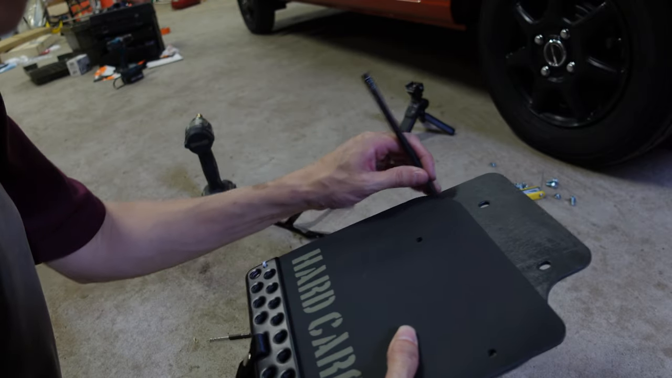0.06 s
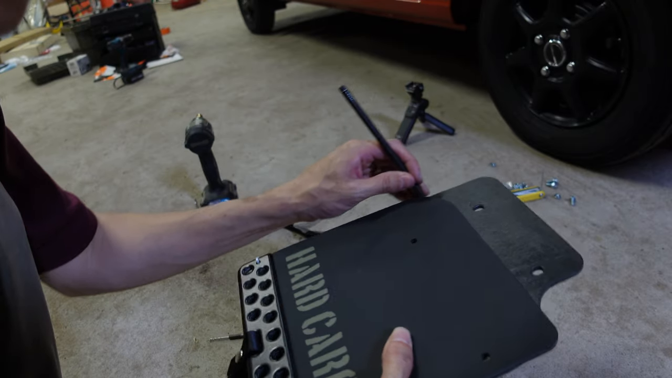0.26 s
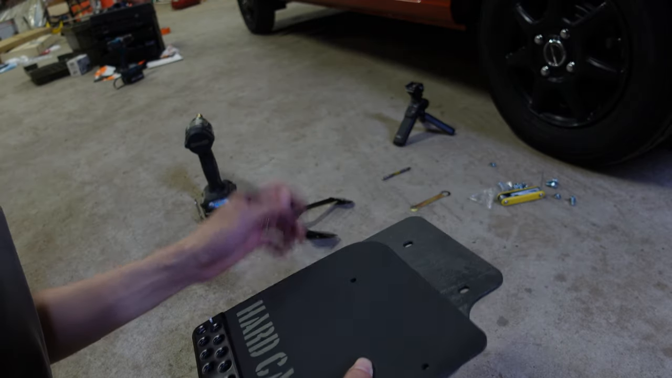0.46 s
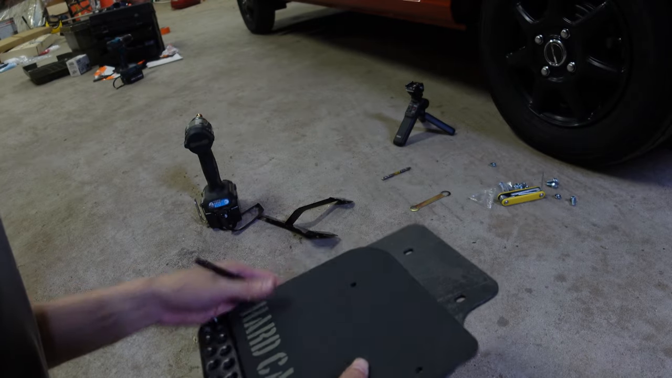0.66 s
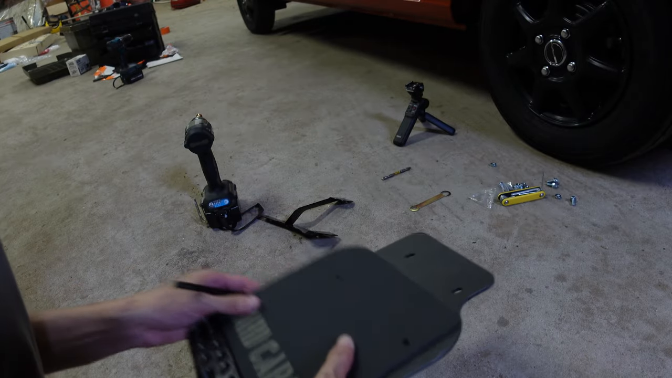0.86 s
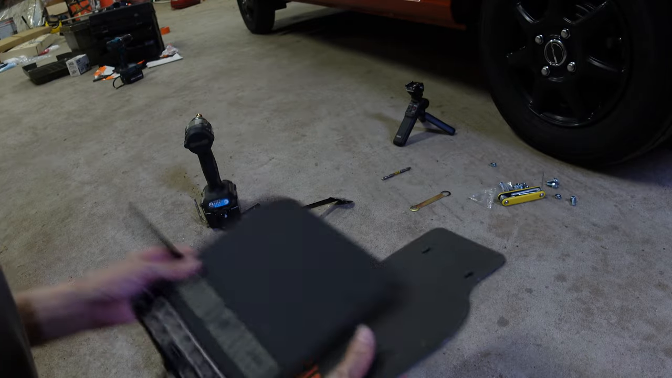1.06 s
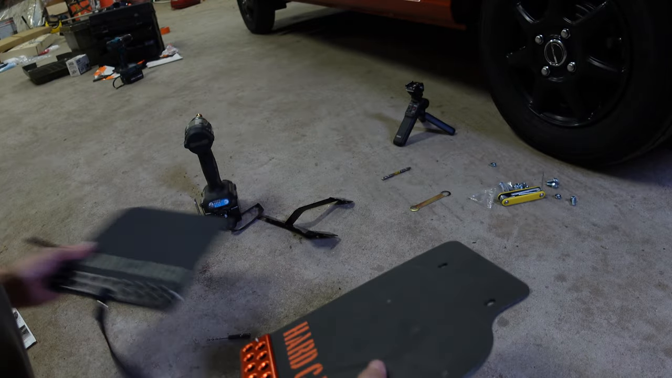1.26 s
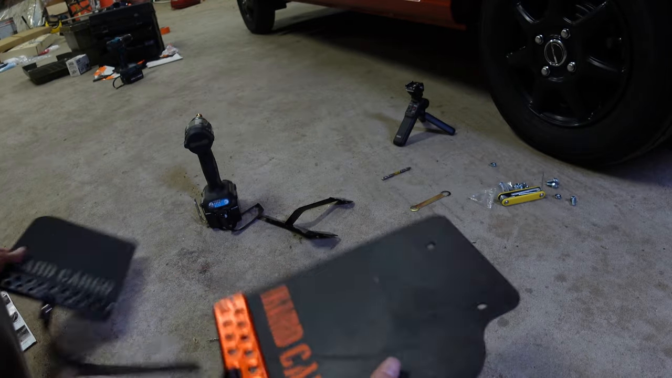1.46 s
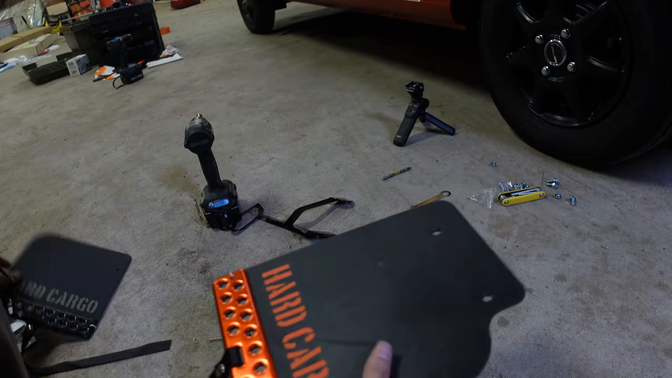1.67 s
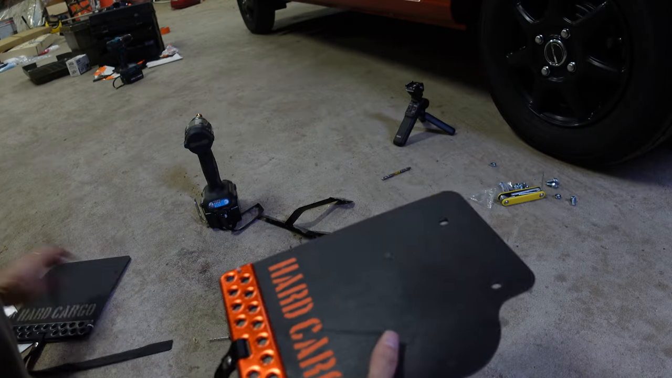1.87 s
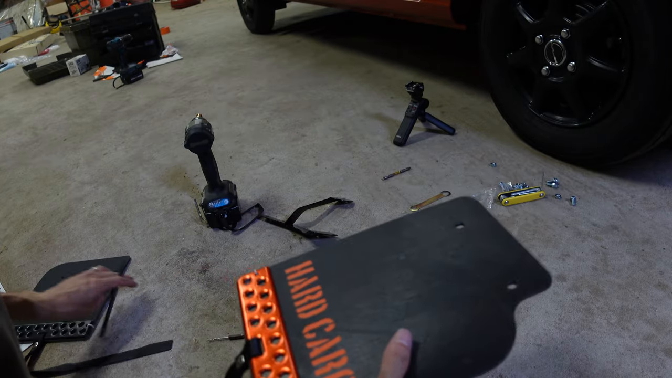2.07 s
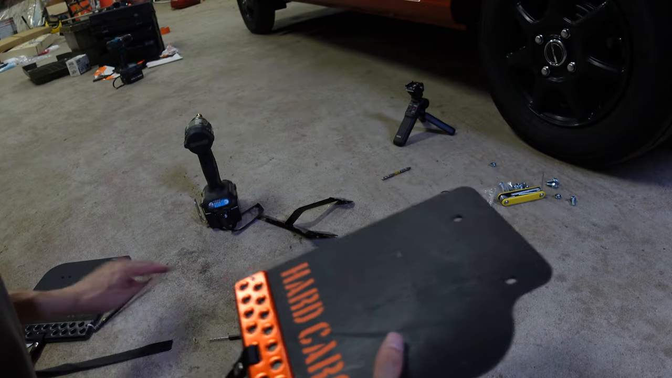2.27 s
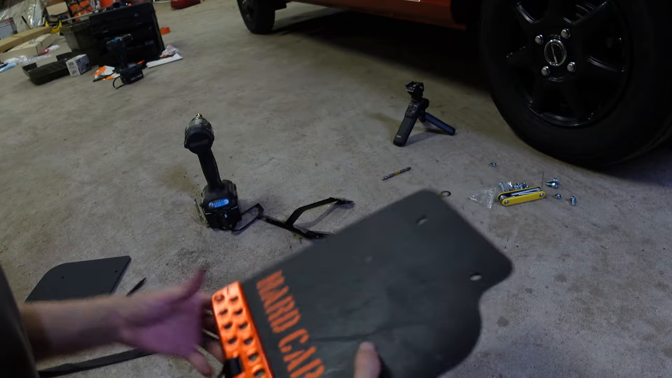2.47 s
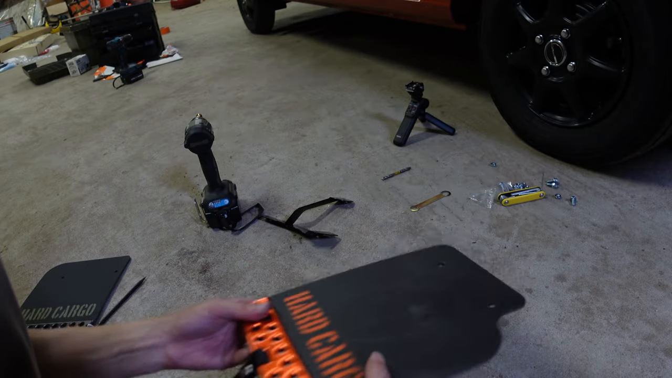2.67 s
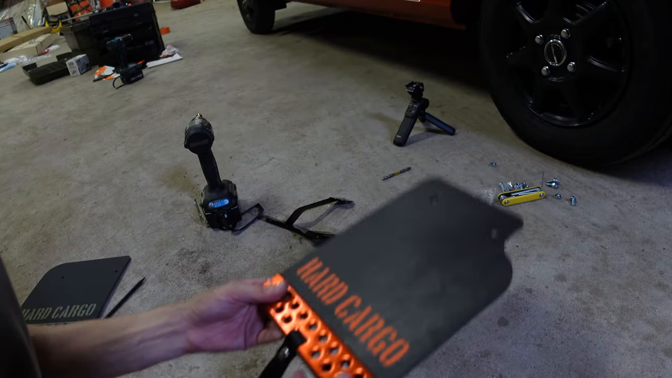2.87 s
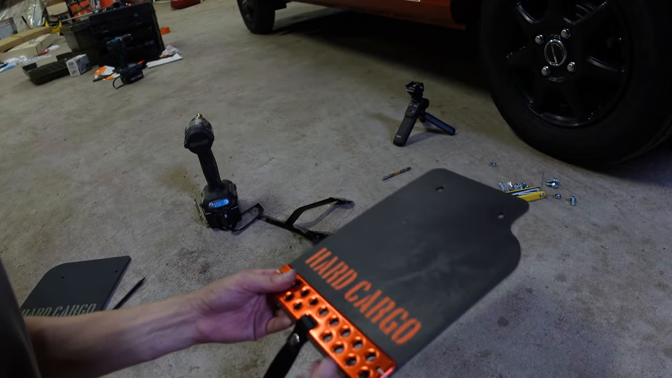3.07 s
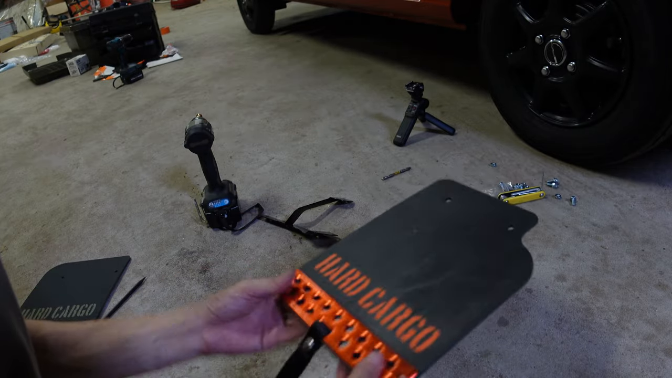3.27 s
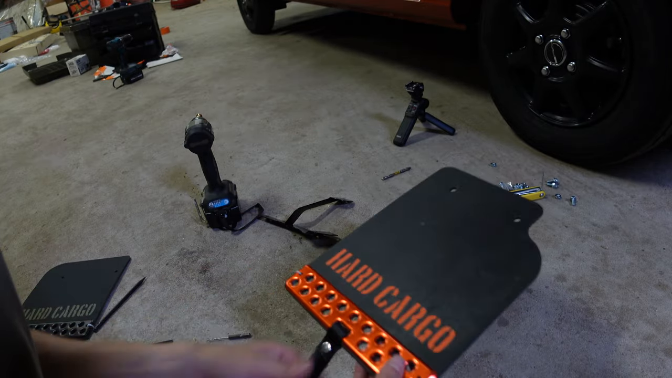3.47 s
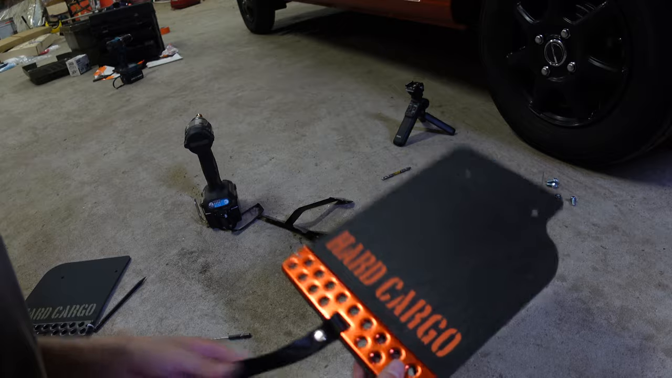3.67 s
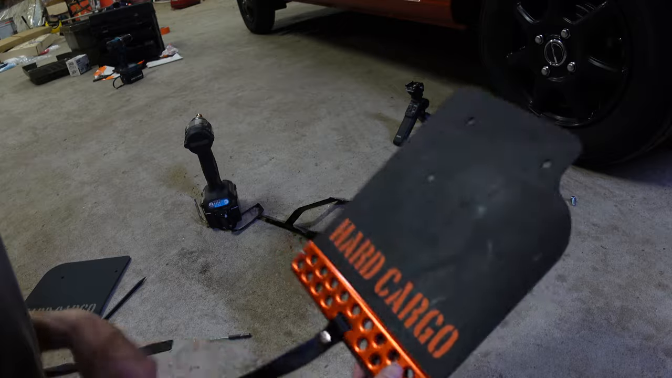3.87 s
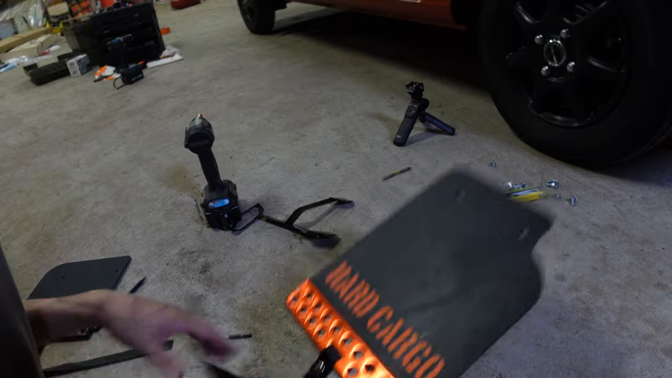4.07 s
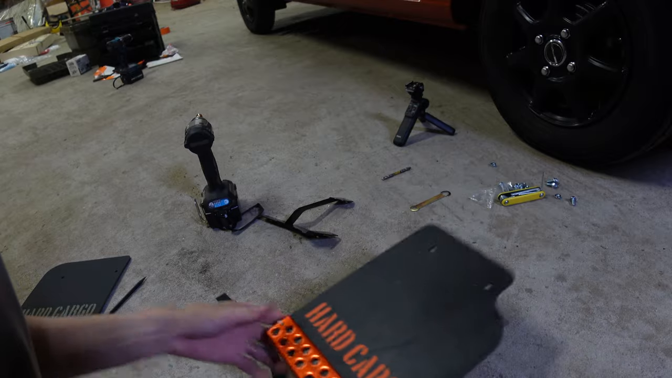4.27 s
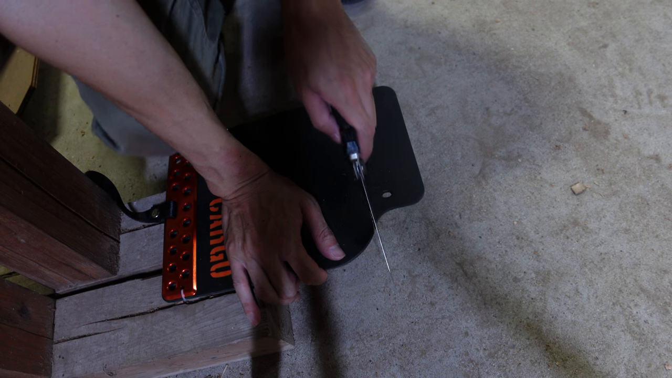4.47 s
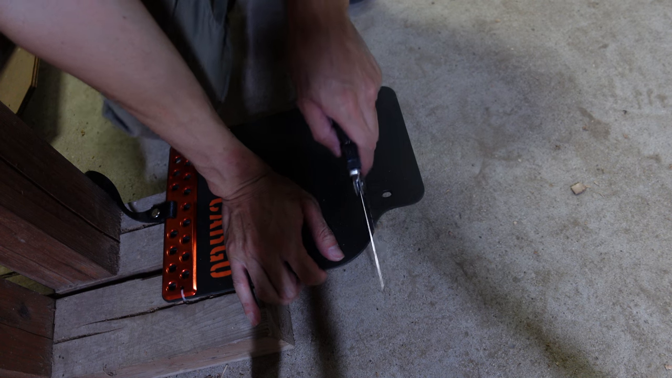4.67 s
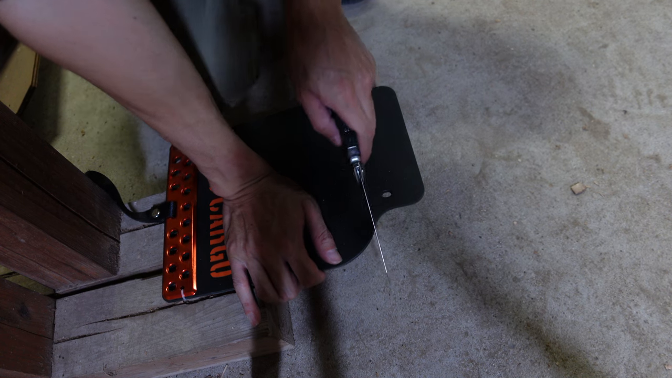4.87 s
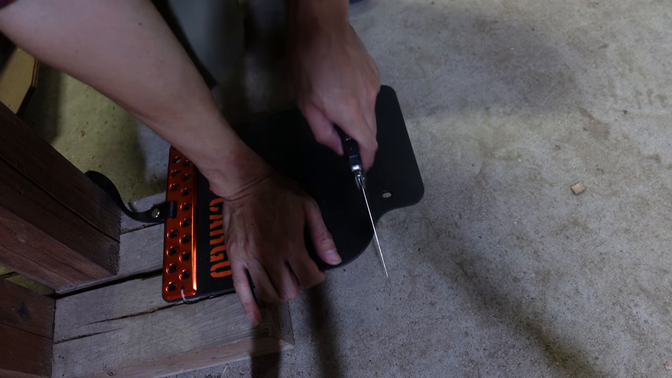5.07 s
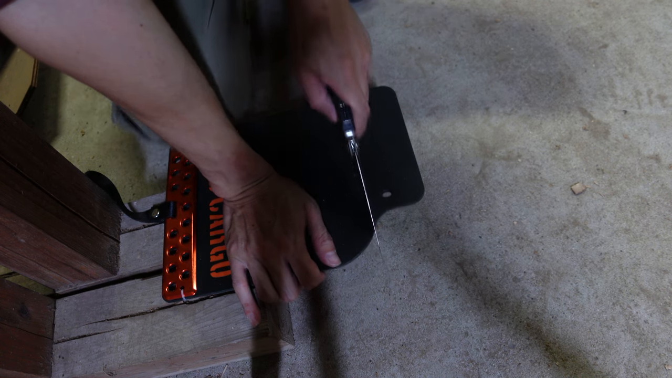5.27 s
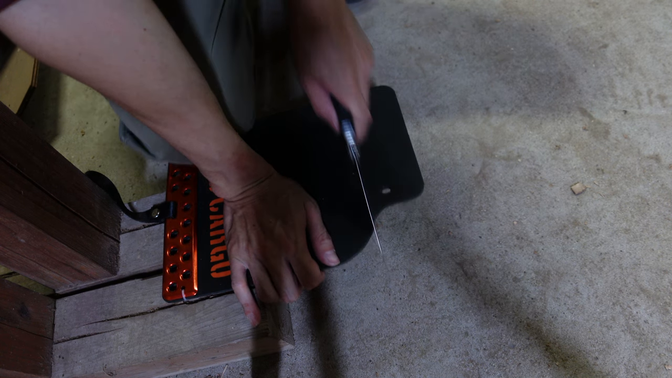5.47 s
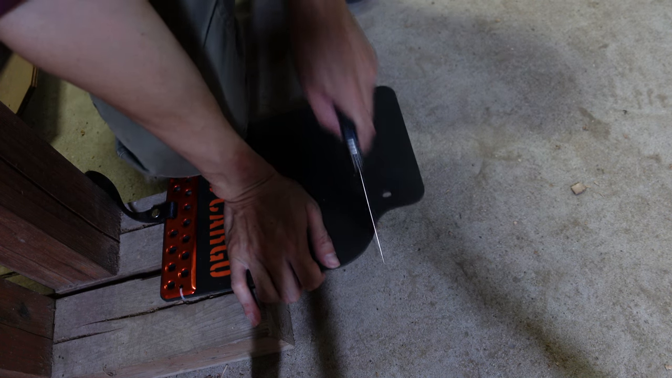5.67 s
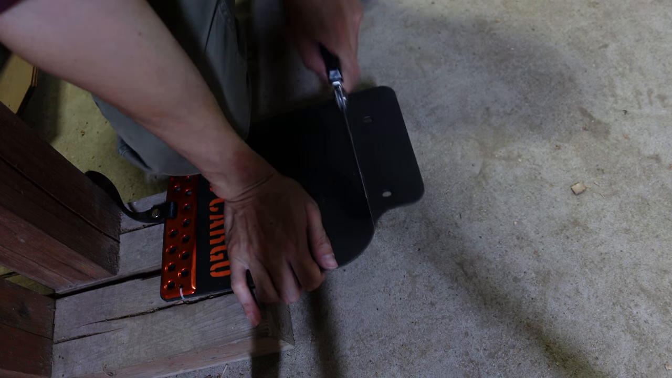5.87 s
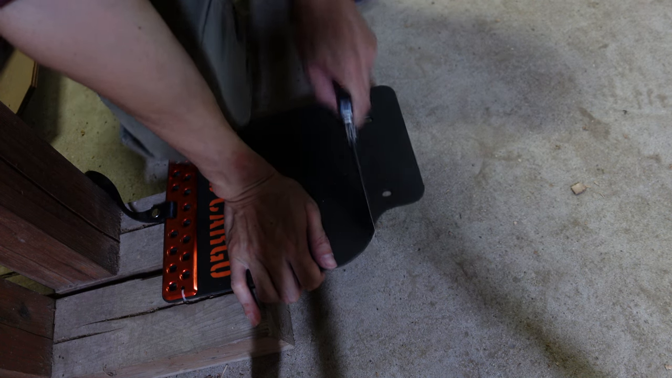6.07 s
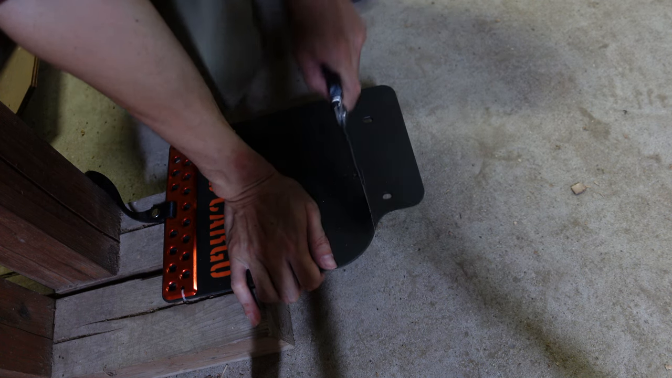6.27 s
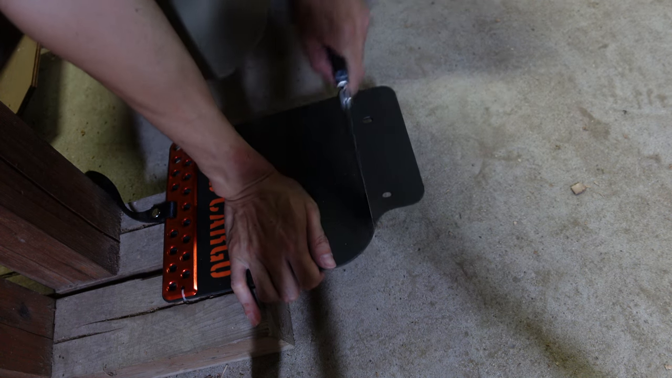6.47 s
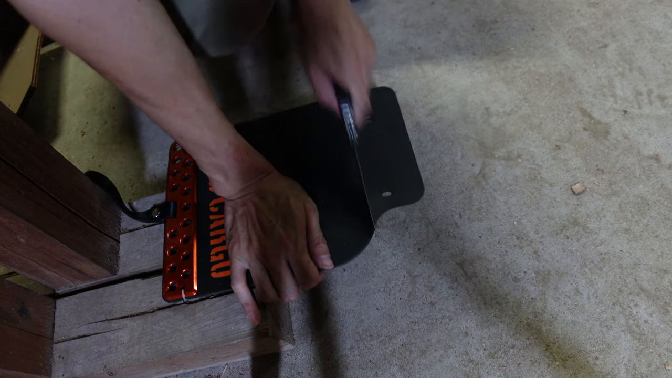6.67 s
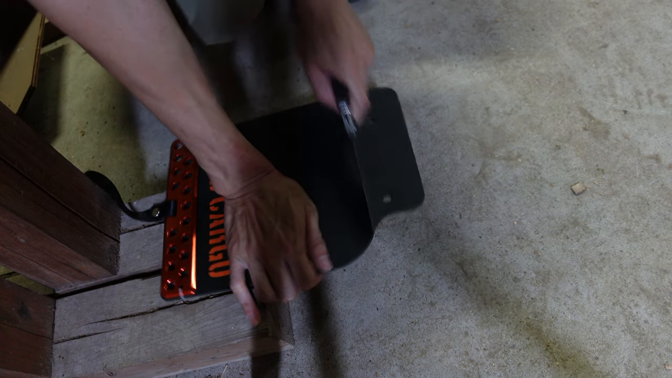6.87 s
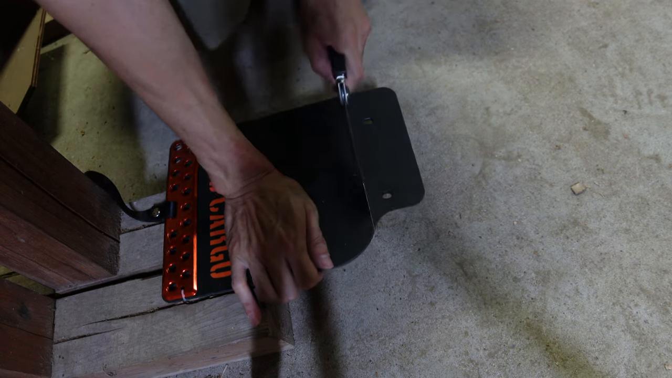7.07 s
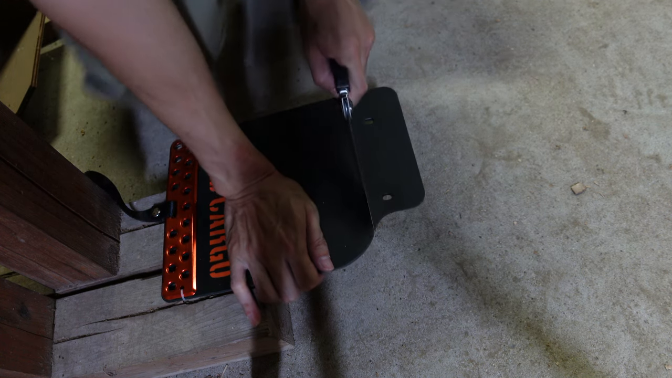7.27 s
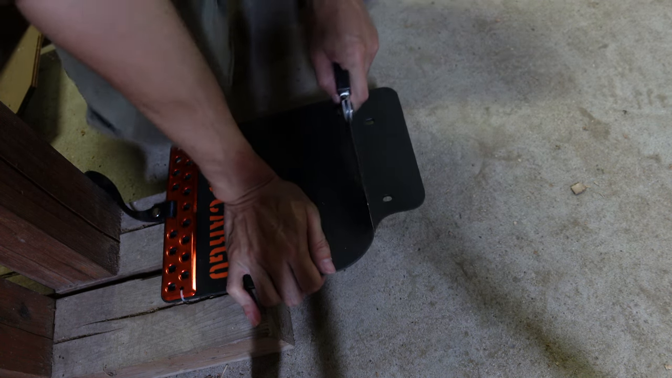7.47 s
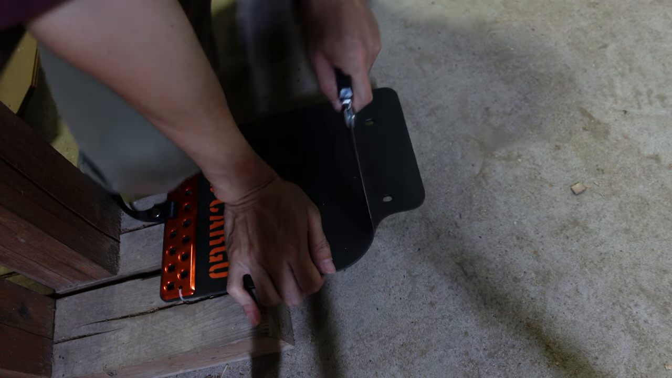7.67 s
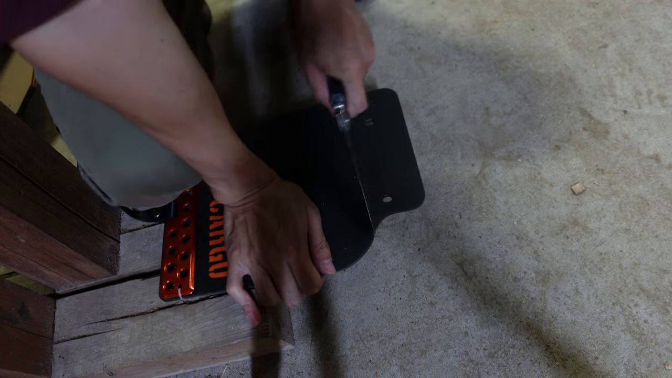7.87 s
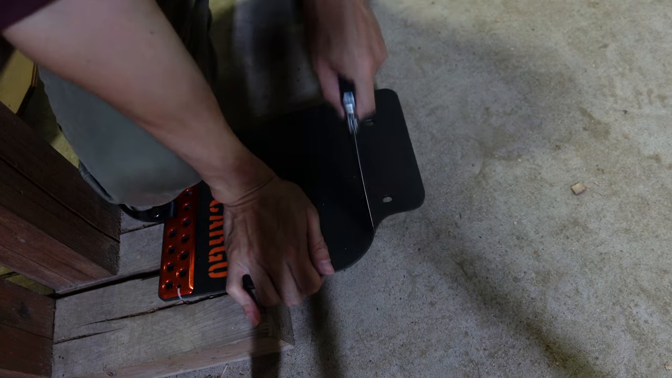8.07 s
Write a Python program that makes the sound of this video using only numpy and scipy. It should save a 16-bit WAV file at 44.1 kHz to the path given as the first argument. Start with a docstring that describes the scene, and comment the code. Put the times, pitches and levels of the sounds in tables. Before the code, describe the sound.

A dull rubber slide and bump open at 0 s over faint night air and insects. At 0.4 s an abrupt cut makes a steady, high, pulsing insect trill much louder, with a lower surging trill and regular chirps, about four a second. Close by, a mat knocks softly near 1.1 and 1.6 s, then drags with a firmer knock around 1.9 s; light rustles and ticks follow to 2.6 s, with a faint tick at 3.9. Another cut at 4.4 s brings the insects back with a wavering whistling cricket. From 4.5 to 4.8 s saw teeth slip in soft stuttering jerks; a bright scrape comes at 5.1. Rapid uneven strokes from 5.3 to 7.1 s, pausing near 6.4, drum the rubber with a dry rasp. Sharp ticks at 7.2-7.3 and the loudest clack at 7.4 end in soft rubbing and insects until 8.1. Short garage echo.

```python
"""A rubber mat slides with a dull knock while insects trill outside an open garage at night.
Handling, rustles and hard ticks follow; a small hand saw slips over the mat's edge, then works through it
on a wooden step. Friction is patchy noise, knocks and strokes ring the mat's modes, wings are pulsed noise
through resonances. A slow chirper and a whistling cricket join in. Two hard cuts join three shots."""
import sys
import numpy as np
from scipy import signal
from scipy.fft import rfft, irfft, next_fast_len
from scipy.io import wavfile
from scipy.ndimage import uniform_filter1d, map_coordinates

SR = 44100
rng = np.random.default_rng(int(sys.argv[2]) if len(sys.argv) > 2 else 0)


def dump(signal):
    """Clip the signal to [-1, 1] and save it as 16-bit WAV at the path in sys.argv[1]."""
    limited = np.clip(np.atleast_2d(signal).T, -1, 1)
    pcm = np.round(limited * 32767).astype(np.int16)
    wavfile.write(sys.argv[1], SR, pcm)


N = 358091
TIME = np.arange(N) / SR


def amp(db):
    """Decibels to an amplitude factor."""
    return 10 ** (np.asarray(db) / 20)


def unit(x):
    """x scaled to rms 1."""
    return x / np.sqrt(np.mean(x ** 2) + 1e-20)


def along(points, hz):
    """Read (frequency [Hz], value) points on a log frequency axis."""
    f, v = np.transpose(points)
    return np.interp(np.log(hz + 1), np.log(f + 1), v)


def gains(tables, fade=0.015):
    """One gain per sample for each dB column, fading to silence outside each table over fade [s]."""
    out = np.zeros((len(tables[0][0]) - 1, N))
    for rows in tables:
        s, *columns = np.transpose(rows)
        at = slice(max(0, round((s[0] - fade) * SR)), round((s[-1] + fade) * SR))
        t = TIME[at]
        gate = np.clip(np.minimum(t - s[0], s[-1] - t) / fade + 1, 0, 1)
        levels = amp([np.interp(t, s, column) for column in columns])
        out[:, at] = np.maximum(out[:, at], gate * levels)
    return out


def swells(rows, fade=0.015):
    """Gains for (crest, rise, fall, dB ..) rows: straight in dB up to the crest, then down and into silence."""
    edge_db = 20  # change over one rise or fall time; the fall runs on for two
    return gains([[(crest - rise, *np.subtract(dbs, edge_db)),
                   (crest, *dbs),
                   (crest + 2 * fall, *np.subtract(dbs, 2 * edge_db))]
                  for crest, rise, fall, *dbs in rows], fade)


def wobble(rate):
    """A smooth random curve, rate knots a second."""
    return map_coordinates(rng.standard_normal(int(N * rate / SR) + 4), [TIME * rate])


def filtered(x, response):
    """x shaped by a complex response of frequency."""
    m = next_fast_len(N + 8192)
    return irfft(rfft(x, m) * response(np.fft.rfftfreq(m, 1 / SR)), m)[..., :N]


def resonant(modes):
    """Causal response of (Hz, width, dB) resonances, summed with alternating sign."""
    def response(f):
        total = 0
        for k, (centre, width, db) in enumerate(modes):
            damping = 1j * f * width
            total = total + (-1) ** k * amp(db) * damping / (centre * centre - f * f + damping)
        return total
    return response


def pair(excite, response, alike):
    """Two draws of an excitation, coloured and mixed to a left-right likeness; rms 1."""
    def mid_side(hz):
        turn = np.arccos(np.clip(along(alike, hz), -1, 1)) / 2
        return response(hz) * [np.cos(turn), np.sin(turn)]
    mid, side = filtered(excite, mid_side)
    return unit(np.array([mid + side, mid - side]))


# stereo width of nearby sounds: (frequency [Hz], left-right likeness [0-1])
NEAR_LIKENESS = [(60, 0.95), (300, 0.97), (1400, 0.81), (3100, 0.92), (7000, 0.71), (15000, .8)]


def friction(spectrum, lumps_db, rate):
    """Noise broken into catches of uneven strength, and patchy across frequency as the contact shifts."""
    lumpy = rng.standard_normal((2, N)) * amp(lumps_db * wobble(rate))
    z = signal.stft(lumpy, nperseg=256)[2]
    patches = uniform_filter1d(rng.standard_normal(z.shape[1:]), size=5, axis=0)
    patches = uniform_filter1d(patches, size=8, axis=1)
    grit = signal.istft(z * amp(2.6 * unit(patches)), nperseg=256)[1][:, :N]
    return pair(grit, lambda hz: amp(along(spectrum, hz)), NEAR_LIKENESS)


def trill(wing, pulse_rate, depth, lumps_db, alike):
    """Many wings scraping: noise pulsing at an unsteady rate [Hz], through the wing modes twice."""
    phase = 2 * np.pi * np.cumsum(pulse_rate * (1 + 0.0978 * wobble(3.6))) / SR
    beat = 1 + depth * np.cos(phase)
    lumps = amp(lumps_db * wobble(30) + 1.3 * lumps_db * wobble(7))
    scrape = rng.standard_normal((2, N)) * beat * lumps
    # squaring the response steepens its skirts
    return pair(scrape, lambda hz: resonant(wing)(hz) ** 2, [(5000, alike)])


def favour(mode_hz, drive_hz, octaves):
    """Modes near the driven frequency answer most."""
    return np.exp(-(np.log2(mode_hz / drive_hz) / octaves) ** 2)


# the night outside, one list a shot: (time [s], high trill [dB], lower trill before its surge [dB],
# air [dB], chorus left minus right [dB])
NIGHT_LEVELS = [
    [(0.0, -63, -76.5, -71.5, -2), (0.25, -65.5, -73.5, -78.5, -2.5), (0.4, -66.5, -72, -77.5, -3)],
    [(0.42, -51, -67, -86.5, -2), (0.8, -51, -62.5, -77, -2), (2.2, -51, -62, -74, -1.6),
     (2.75, -51.5, -64, -78, -2), (3.25, -53, -65, -82.5, -3.5), (3.75, -56.5, -70, -82, -5),
     (4.4, -65.5, -82, -86.5, -2.5)],
    [(4.43, -53, -74, -77.5, -6), (5.0, -53.5, -68, -75, -4.5), (6.4, -52.5, -82, -67.5, -5),
     (7.3, -53, -72, -70.5, -5.5), (8.12, -64, -81, -72.5, -8)],
]


def night():
    """The insects lean to the right by a left-right level difference, over the air's own hush."""
    high, low, air, lean = gains(NIGHT_LEVELS)
    chorus = trills(high, low) + thin_trill() + chirps() + whistles()
    return chorus * [np.sqrt(lean), 1 / np.sqrt(lean + 1e-9)] + air * hush()


# wing resonances of the two main trills: (centre [Hz], width [Hz], level per filter pass [dB])
HIGH_WING = [(5402, 383, 10.5), (5726, 273, 8.5)]
LOW_WING = [(4630, 246, 0)]


def trills(high, low):
    """Two bands of pulsing wing noise; the lower one surges periodically."""
    period, crest, depth_db = 1.085, 1.03, 2  # s, s, dB either way
    surge = amp(depth_db * np.cos(2 * np.pi * (TIME - crest) / period))
    upper = high * trill(HIGH_WING, 60, 0.19, lumps_db=1.0, alike=0.74)
    return upper + low * surge * trill(LOW_WING, 45, 0.15, lumps_db=2.5, alike=0.7)


# colour of the night air: (frequency [Hz], relative level [dB per Hz])
AIR_SPECTRUM = [(50, -34), (100, -5), (220, 1.5), (600, 0), (1500, -4), (2100, -8.5), (2600, -1.5),
                (3100, -4), (4300, -3), (6500, -3.5), (7300, -28.5), (8600, -14.5), (9500, -36.5),
                (15500, -41)]


def hush():
    """Air as steady coloured noise, nearly unrelated left and right."""
    likeness = [(60, 0.23), (300, 0.13), (3000, 0.39)]
    return pair(rng.standard_normal((2, N)), lambda hz: amp(along(AIR_SPECTRUM, hz)), likeness)


# mats and hands sliding: (crest [s], rise [s per 20 dB], fall [s per 20 dB],
# body [dB], scrape [dB], hiss [dB])
SLIDE_SWELLS = [(0, .01, 0.086, -51, -60.5, -76.5), (.398, .08, 0.0039, -75, -90, -110),
                (1.822, .008, .1, -61.5, -57.5, -62), (1.849, 0.035, .15, -54.5, -47.5, -46),
                (1.919, .04, 0.11, -58.5, -50.5, -52), (5.0, 0.014, .3, -66.5, -53.5, -54),
                (5.07, 0.079, 0.0286, -57.5, -46, -51.5), (5.094, .015, .1, -53.5, -38.5, -39),
                (5.116, 0.053, 0.023, -48.5, -37.5, -35.5), (5.15, 0.016, 0.16, -60, -46.5, -50.5),
                (5.23, 0.11, 0.078, -49, -51.5, -62), (7.21, 0.026, 0.12, -69, -62, -60),
                (7.288, .01, 0.055, -70, -64, -56), (7.305, .08, 0.18, -59.5, -64.5, -71),
                (7.41, .01, 0.017, -44, -52, -59), (7.458, .03, 0.089, -55, -55.5, -68),
                (7.502, 0.061, 0.071, -71, -56.5, -54.5), (7.688, 0.11, 0.19, -61, -63.5, -70),
                (7.765, 0.27, 0.17, -68.5, -62, -70), (8.12, 0.024, .01, -62.5, -90, -90)]
# colours of the three layers: (frequency [Hz], relative level [dB])
BODY_SPECTRUM = [(120, -31), (250, -6), (480, 8.5), (850, 3), (1200, 0.5), (1600, -66.5)]
SCRAPE_SPECTRUM = [(1000, -29), (1400, 2), (1850, 7), (2600, 4.5), (4300, 1.5), (5000, -29.5)]
HISS_SPECTRUM = [(2500, -50), (3500, -3), (6500, -0.5), (10000, -6.5), (14000, -16.5), (15700, -23.5)]  # the saw's crumbs share it


def slides():
    """Rubber and skin drag over rubber and concrete: low body, mid scrape and high hiss of friction."""
    body, scrape, hiss = swells(SLIDE_SWELLS, fade=0.013)
    drag = body * friction(BODY_SPECTRUM, 3.1, 120)
    drag += scrape * friction(SCRAPE_SPECTRUM, 1.4, 150)
    return drag + hiss * friction(HISS_SPECTRUM, 1.3, 180)


# dull knocks on the mat: (start [s], level before the modes' weighting [dB], driven frequency [Hz])
KNOCK_HITS = [(.003, -57, 510), (0.016, -51, 524), (1.068, -56, 690), (1.093, -42, 450), (1.103, -60, 1200),
              (1.115, -58, 480), (1.58, -47, 440), (1.591, -48.5, 890), (1.822, -51.5, 400),
              (1.906, -37, 1150), (1.908, -46, 503), (1.96, -42, 1120), (2.602, -62.5, 417),
              (3.859, -57.5, 905), (5.346, -41, 810), (5.463, -36, 744), (5.635, -52, 504),
              (5.691, -32, 510), (5.734, -32.5, 510), (5.794, -34, 497), (5.883, -35, 345),
              (6.682, -44, 394), (7.257, -47.5, 422), (7.379, -20, 1210), (7.381, -19.5, 2280),
              (7.387, -24, 460), (7.398, -45, 452), (7.414, -39, 418), (7.45, -48, 450), (7.474, -49, 450)]
# modes of the rubber mat: (frequency [Hz], nominal width [Hz], mean level [dB])
MAT_MODES = [(150, 60, -18), (210, 36, 4), (294, 50, 0), (405, 45, 1), (545, 90, 0), (710, 70, 0),
             (840, 80, 0), (1000, 100, -2), (1160, 100, -2), (1500, 250, -4), (1800, 250, -8),
             (2290, 120, -5)]


def knocks():
    """Each knock rings the mat's modes at new strengths, softly started, with a short rattle."""
    grip = 1.43  # a knocked mat is held, so its modes die this much faster than their widths imply
    out, t = np.zeros(N), TIME[:SR // 8]
    rattle_band = signal.butter(2, [300, 2600], "band", fs=SR)
    onset = 1 - np.exp(-t / 0.0014)
    for s, db, drive_hz in KNOCK_HITS:
        ring = 0
        for hz, width, level in MAT_MODES:
            strength = amp(level + rng.normal(0, 2)) * favour(hz, drive_hz, 0.41)
            decay = np.exp(-np.pi * grip * width * t)
            ring = ring + strength * decay * onset * np.sin(2 * np.pi * hz * t)
        rattle = signal.lfilter(*rattle_band, rng.standard_normal(len(t)) * amp(-60 * t / 0.06))
        out[round(s * SR):][:len(t)] += amp(db) * (ring + 0.4 * rattle)
    return out


# thin trill that comes and goes: (crest [s], rise [s per 20 dB], fall [s per 20 dB], level [dB])
THIN_SWELLS = [(.33, .25, 0.12, -77.5), (2.266, 0.045, 0.31, -66), (2.642, .13, 0.47, -71),
               (4.68, 0.27, 0.17, -69)]
# its wing resonance: (centre [Hz], width [Hz], level per filter pass [dB])
THIN_WING = [(3930, 220, 0)]


def thin_trill():
    """A third, narrow band of pulsing wing noise in swells."""
    return swells(THIN_SWELLS) * trill(THIN_WING, 55, 0.19, lumps_db=1.0, alike=0.56)


# chirping bouts: (first [s], period [s], last [s], first [dB], middle [dB], last [dB])
CHIRP_BOUTS = [(0.529, 0.2355, 2.95, -68, -67, -74.5), (4.46, .21, 6.65, -67, -63.5, -65),
               (6.77, 0.211, 8.1, -73, -72.5, -75)]
# chirper's wing resonances: (centre [Hz], width [Hz], level per filter pass [dB])
CHIRPER_WING = [(3344, 350, -5), (3703, 230, -3.5)]
# shots joined by the cuts: (start [s], end [s])
SHOT_SPANS = [(0, .399), (.408, 4.406), (4.412, 8.2)]


def chirps():
    """Evenly spaced chirps of one shape; the level drifts through each bout, held back until its own shot."""
    shape = [(-0.085, -14), (-0.035, 0), (0.017, 0), (0.098, -14)]  # (s around the middle, dB)
    level = 0
    for first, period, last, *dbs in CHIRP_BOUTS:
        cut = max(start for start, _ in SHOT_SPANS if start < first)
        drift = [first, (first + last) / 2, last]
        bout = gains([[(s + at, np.interp(s, drift, dbs) + db) for at, db in shape]
                      for s in np.arange(first, last, period)])
        level = level + (TIME >= cut) * bout
    return level * trill(CHIRPER_WING, 45, 0.4, lumps_db=0.7, alike=0.75)


# sleeve and fingers: (crest [s], rise [s per 20 dB], fall [s per 20 dB], level [dB])
RUSTLE_SWELLS = [(1.09, .008, .065, -61), (1.33, 0.38, 0.23, -67), (1.59, 0.015, .115, -58),
                 (2.268, 0.024, .11, -57.5), (3.666, 0.061, .03, -72), (4.498, .018, 0.32, -66),
                 (4.676, .08, .09, -61)]
# their colour: (frequency [Hz], relative level [dB])
RUSTLE_SPECTRUM = [(2500, -30.5), (4000, 8), (7000, 3.5), (9000, -10), (11000, -15), (14000, -30),
                   (15700, -37.5)]


def rustles():
    """The lighter rustle of handling: bright friction noise in swells."""
    return swells(RUSTLE_SWELLS) * friction(RUSTLE_SPECTRUM, 2.7, 80)


# small hard ticks: (start [s], level before the band filter [dB], centre [Hz])
TICK_HITS = [(1.068, -50, 2230), (1.1, -55, 7800), (1.593, -42.5, 7200), (2.117, -45, 2850),
             (2.118, -64, 10150), (3.856, -57, 2670), (3.865, -47, 2700), (5.408, -53, 7840),
             (5.462, -34, 4050), (5.998, -49, 9900), (6.241, -41, 4530), (6.319, -45.5, 6160),
             (6.683, -42.5, 3860), (7.131, -56, 8800), (7.145, -61, 8900), (7.195, -26.5, 3200),
             (7.204, -54, 9600), (7.277, -52, 6500), (7.284, -28, 4440), (7.291, -30, 4970),
             (7.3, -42, 7100), (7.31, -33, 3100), (7.388, -27, 3870), (7.771, -58, 7900)]


def ticks():
    """Noise bursts of a few milliseconds with a faint longer tail, each in its own band."""
    out, t = np.zeros(N), TIME[:SR // 8]
    decay = amp(-60 * t / 0.008) + amp(-16 - 60 * t / 0.06)
    for s, db, hz in TICK_HITS:
        burst = decay * rng.standard_normal(len(t))
        band = signal.butter(2, np.clip([hz / 1.28, hz * 1.28], 500, 16000), "band", fs=SR)
        out[round(s * SR):][:len(t)] += amp(db) * signal.lfilter(*band, burst)
    return out


# whistling cricket: (start [s], end [s], level before its flutter [dB])
WHISTLE_SPANS = [(4.444, 4.793, -71.5), (5.9, 6.1, -71), (6.737, 7.184, -69), (7.803, 8.05, -74.5)]


def whistles():
    """One cricket's near-pure tone, fluttering in level and phase."""
    tone = np.sin(2 * np.pi * 4470 * TIME + 0.65 * wobble(9.9))
    level = gains([[(start, db), (end, db)] for start, end, db in WHISTLE_SPANS])
    return level * amp(2.9 * wobble(32)) * tone


# the blade slips tooth by tooth into the edge: (time [s], mat edge level [dB])
TOOTH_SLIPS = [(4.5228, -71), (4.5411, -58.5), (4.5602, -52), (4.5804, -60), (4.593, -58), (4.6292, -55),
               (4.652, -52), (4.6704, -51), (4.6784, -51), (4.6928, -60), (4.7227, -46), (4.7366, -49),
               (4.7484, -46), (4.7626, -48), (4.7776, -53.5), (4.804, -57.5), (4.8105, -47)]
# blade, mat edge and step, in that order: (mean frequency [Hz], swell time [s])
EDGE_PARTS = [(1750, 0.0027), (814, 0.0023), (265.6, 0.0058)]


def slips():
    """Each slip is a soft jerk: blade, mat edge and step swell and die within a few cycles."""
    blade_first_db, blade_dulls = 4.5, 49  # dB over the edge at first; dB per s lost as it sinks in
    press_s, step_light_db, step_pressed_db = 4.71, -22.5, -4  # the hand bears down and the step answers
    out, t = np.zeros(N), TIME[:SR // 12]
    for s, db in TOOTH_SLIPS:
        blade_db = blade_first_db - blade_dulls * (s - TOOTH_SLIPS[0][0])
        step_db = step_pressed_db if s > press_s else step_light_db
        for part_db, (hz, swell) in zip((blade_db, 0, step_db), EDGE_PARTS):
            drift = np.cumsum(rng.normal(0, 0.0068, len(t)))  # phase drifts: a rough ring
            cycles = hz * rng.normal(1, 0.048) * t + rng.random() + drift
            envelope = t / swell * np.exp(1 - t / swell)
            out[round(s * SR):][:len(t)] += amp(db + part_db) * np.sin(2 * np.pi * cycles) * envelope
    return out


# saw strokes: (start [s], end [s], full mat drumming [dB], full blade rasp [dB], nominal driven pitch [Hz])
SAW_STROKES = [(5.343, 5.417, -43.5, -52.5, 726), (5.462, 5.496, -53.5, -65, 650),
               (5.494, 5.591, -41.5, -51.5, 444), (5.636, 5.74, -39, -54.5, 580),
               (5.783, 5.887, -35, -44.5, 526), (5.865, 5.942, -50.5, -64, 380),
               (5.955, 6.067, -42.5, -57.5, 610), (6.054, 6.108, -56, -83, 620),
               (6.118, 6.202, -39.5, -53.5, 440), (6.259, 6.343, -55.5, -62, 580),
               (6.54, 6.66, -41.5, -63.5, 663), (6.696, 6.793, -37.5, -50.5, 576),
               (6.846, 6.935, -40, -56, 700), (6.947, 7.013, -61, -69, 605),
               (7.013, 7.084, -46, -56.5, 615)]
# colour of the blade's rasp: (frequency [Hz], relative level [dB])
RASP_SPECTRUM = [(1100, -7), (1500, 4), (1850, -2), (2200, -2), (2750, -14), (3300, -6), (4300, -7.5),
                 (6000, -14), (7000, -55)]


def saw():
    """Teeth catch unevenly: catches drum the mat's modes, the blade rasps, crumbs hiss from mid-stroke on."""
    bite_db, full_at, dust_db = -49, 0.49, -14  # first drumming, share of stroke to full, hiss under rasp
    sag = 0.21  # octaves the driven pitch starts above, and ends below, its nominal value
    levels, pitch = [], []
    for start, end, full, ra, hz in SAW_STROKES:
        dust = ra + dust_db
        levels.append([(start, min(bite_db, full), ra - 5, dust - 15.5),
                       (start + full_at * (end - start), full, ra, dust),
                       (end, full - 6, ra - 6, dust - 2.0)])
        pitch += [(start, hz * 2 ** sag), (end, hz / 2 ** sag)]
    drum, rasp, hiss = gains(levels)

    at = slice(round(5.3 * SR), round(7.2 * SR))  # the span of sawing
    drive_hz = np.interp(TIME[at], *np.transpose(sorted(pitch)))
    count = len(drive_hz)
    caught = rng.random(count) < 420 / SR  # about 420 catches a second
    catches = caught * amp(3.5 * rng.standard_normal(count) + 1.5 * wobble(60)[at])

    t, mat = TIME[:SR // 16], 0
    for hz, width, db in MAT_MODES[:10]:  # only the lower modes drum
        # rubber softens the onset; each mode sees the catches with its own signs
        shape = t * np.exp(-2 * np.pi * width * t) * np.sin(2 * np.pi * hz * t)
        ring = signal.fftconvolve(catches * rng.choice([-1, 1], count), shape)[:count]
        mat = mat + amp(db) * favour(hz, drive_hz, 1.3) * unit(ring)
    drumming, teeth = np.zeros(N), np.ones(N)
    drumming[at] = unit(mat)
    # rasp and hiss flare for a few milliseconds at each catch
    flare = signal.fftconvolve(catches, np.exp(-t / 0.0046))[:count]
    teeth[at] = unit(1.4 + unit(flare))
    blade = rasp * teeth * friction(RASP_SPECTRUM, 1.2, 200)
    crumbs = hiss * teeth * friction(HISS_SPECTRUM, 2.4, 250)
    return drum * drumming + blade + crumbs


# how long the garage rings: (frequency [Hz], time to fall 60 dB [s])
GARAGE_DECAY = [(200, 0.51), (2000, 0.29), (10000, 0.053)]


def garage(x):
    """The walls' answer: a stereo noise tail in which each frequency dies at its own speed."""
    hz, t, z = signal.stft(rng.standard_normal((2, SR // 3)), SR, nperseg=256)
    decay = amp(-60 * t / along(GARAGE_DECAY, hz)[:, None])
    tail = signal.istft(z * decay, SR, nperseg=256)[1]
    return signal.fftconvolve(x[None], tail / np.linalg.norm(tail[0]), axes=1)[:, :N]


def scene():
    """Hits and rubbing with their garage echo, and the night outside without it."""
    hits = knocks() + ticks() + slips()
    rubbing = slides() + rustles() + saw()
    echo = garage(amp(-11) * hits + amp(-17) * rubbing[0])
    echo = 0.7 * echo + 0.3 * echo[::-1]  # part of it crosses sides
    return hits + rubbing + echo + night()


def record(dry):
    """Shots stop dead and later ones fade in; the microphone drops bass, and nothing passes the band limit."""
    fade_s, bass_hz, top_hz = 0.036, 100, 15720
    edit = 0
    for start, end in SHOT_SPANS:
        fade = np.clip((TIME - start) / fade_s, start == 0, 1) ** 2  # the opening shot starts at full level
        edit = edit + fade * (TIME >= start) * (TIME < end)
    noise_floor = amp(-100) * rng.standard_normal(dry.shape)

    def microphone(hz):
        return (1j * hz / (1j * hz + bass_hz)) ** 4 * (hz < top_hz)
    return filtered(dry * edit + noise_floor, microphone)


dry = scene()
out = record(dry)
dump(out)
```